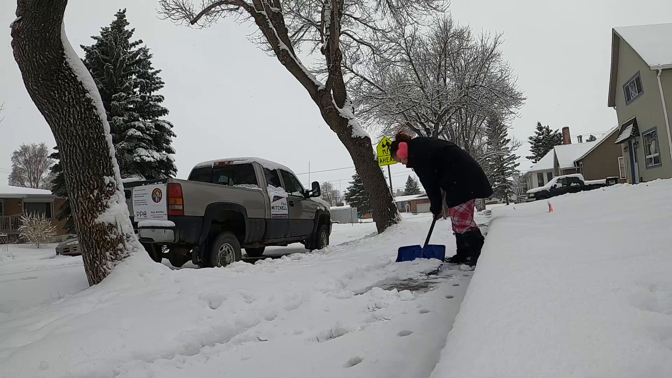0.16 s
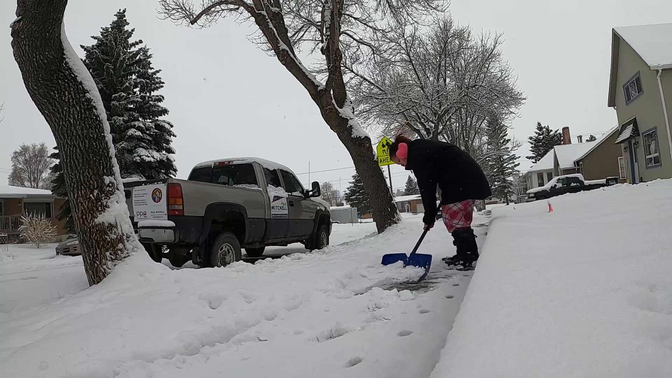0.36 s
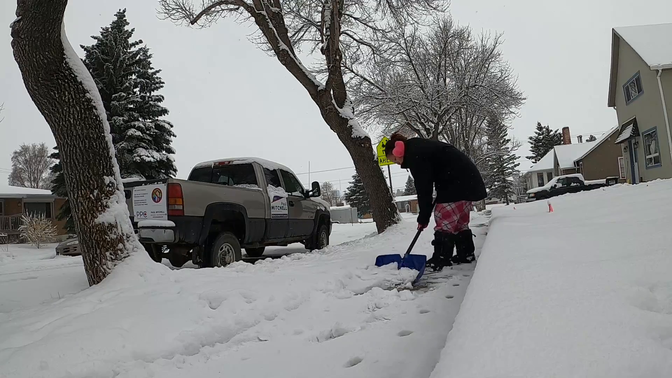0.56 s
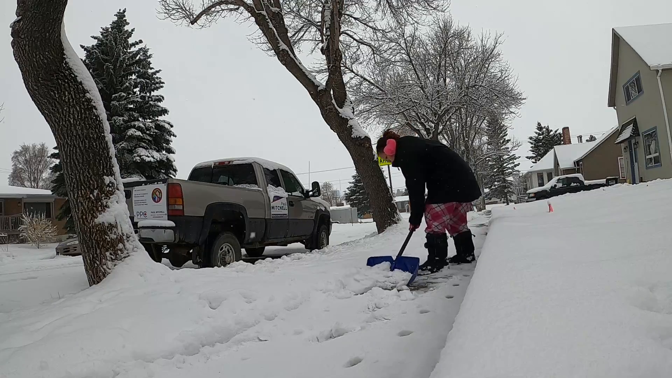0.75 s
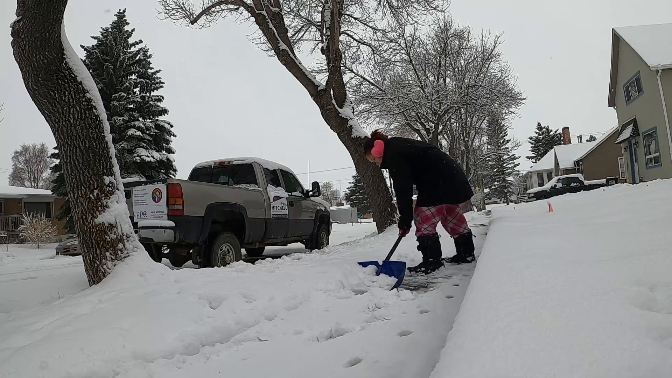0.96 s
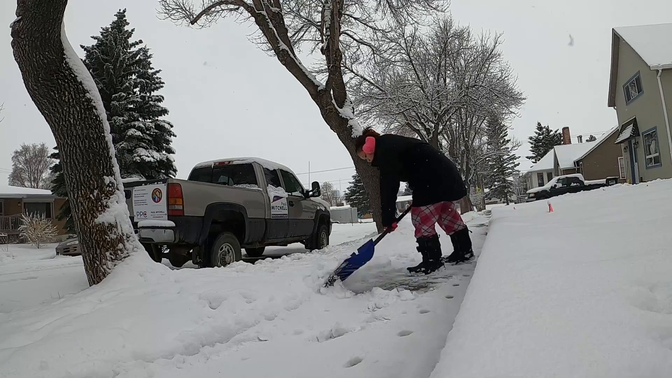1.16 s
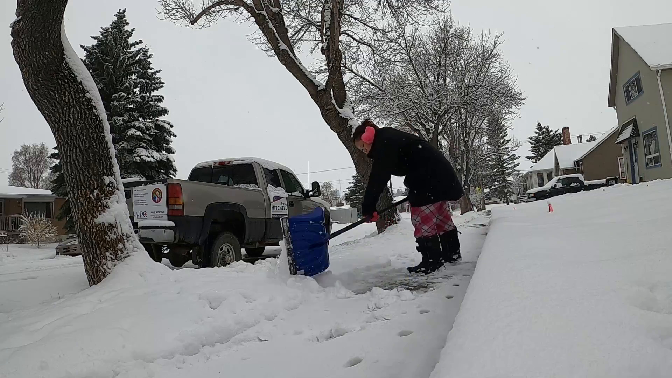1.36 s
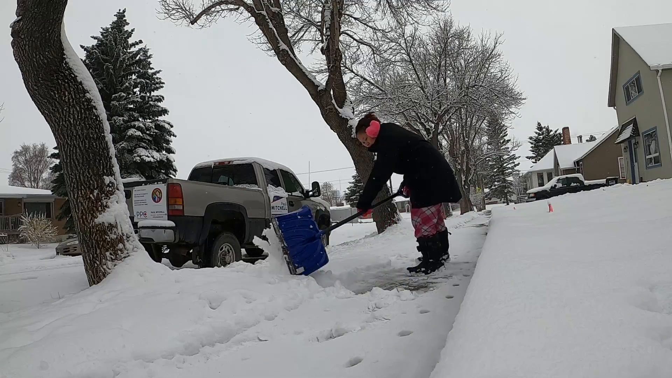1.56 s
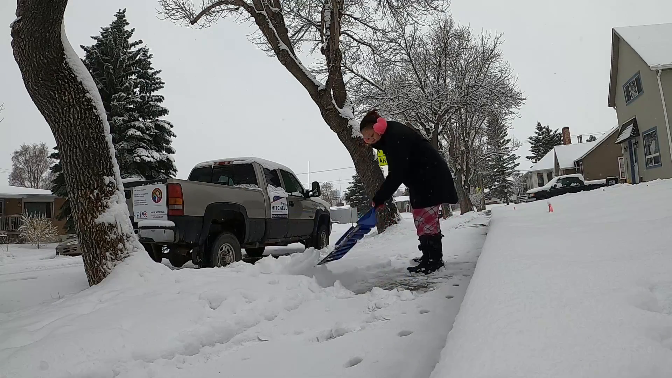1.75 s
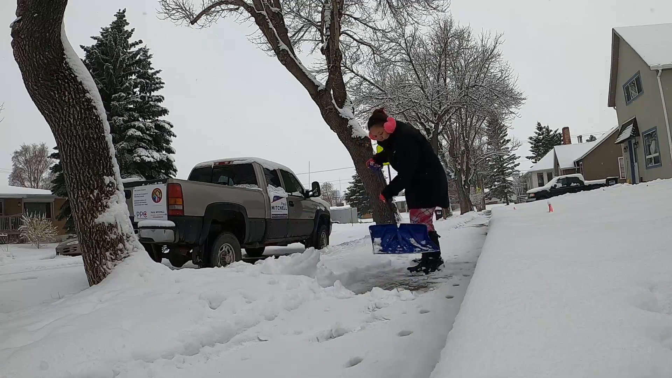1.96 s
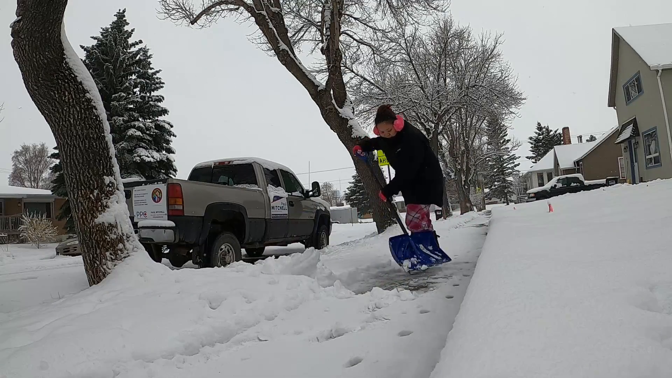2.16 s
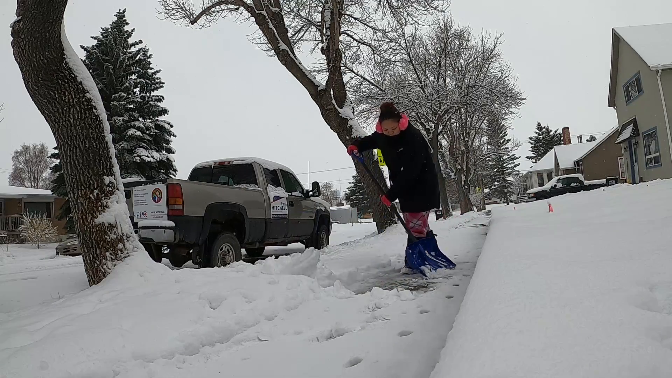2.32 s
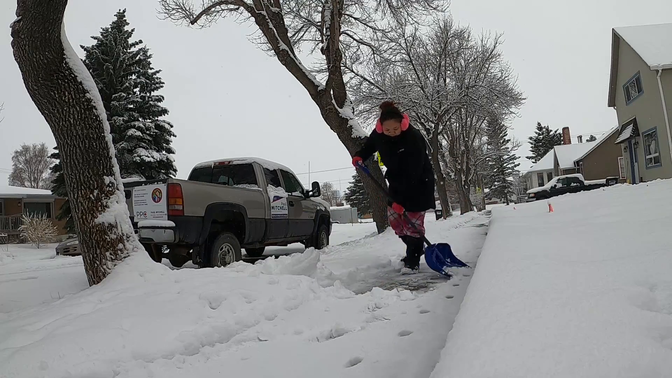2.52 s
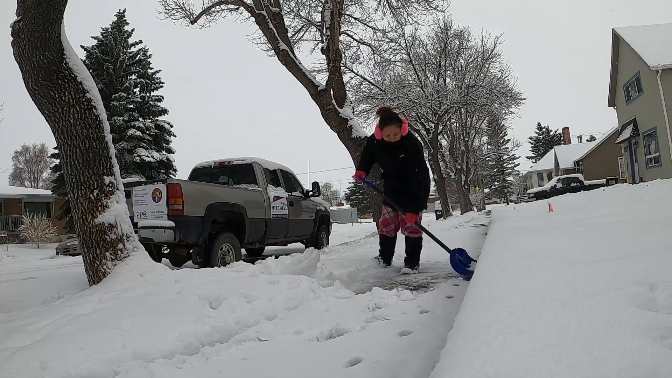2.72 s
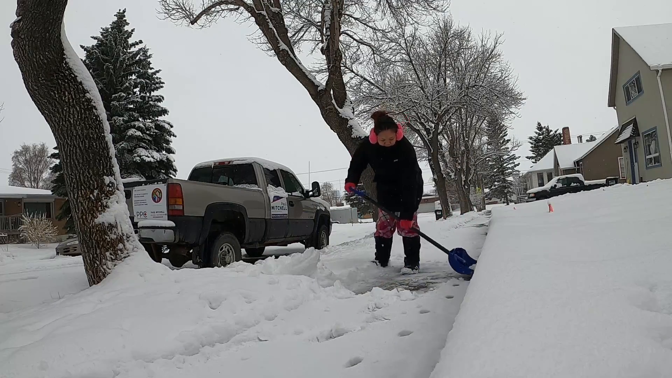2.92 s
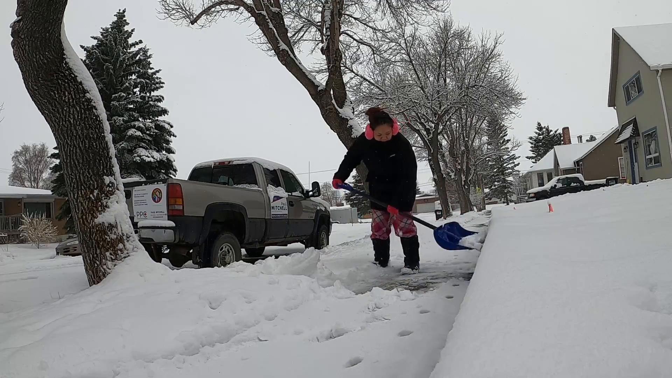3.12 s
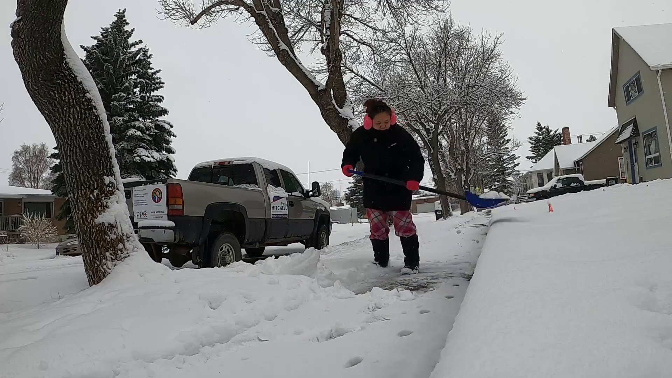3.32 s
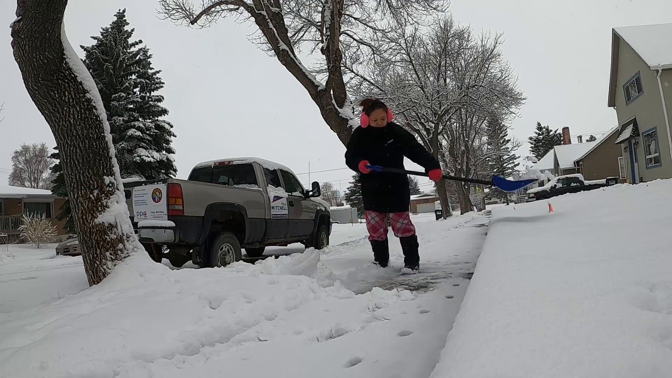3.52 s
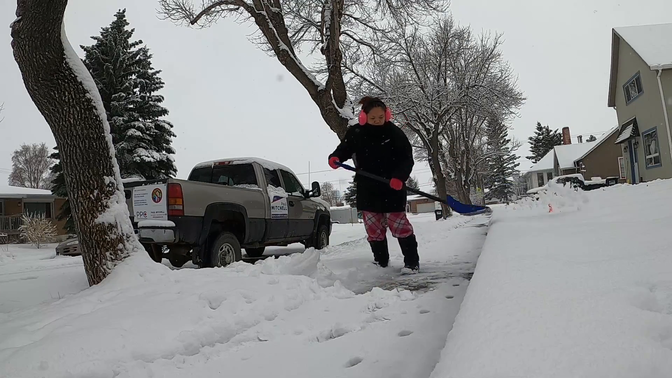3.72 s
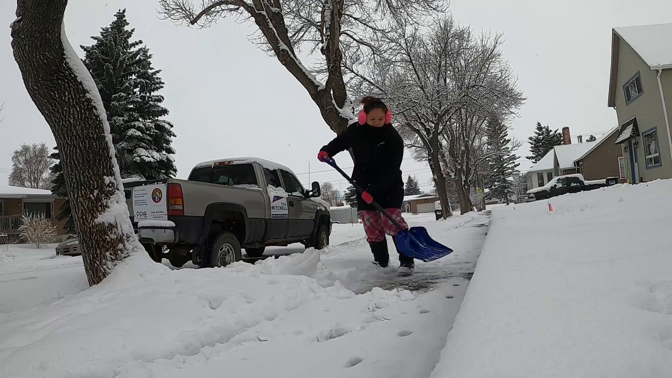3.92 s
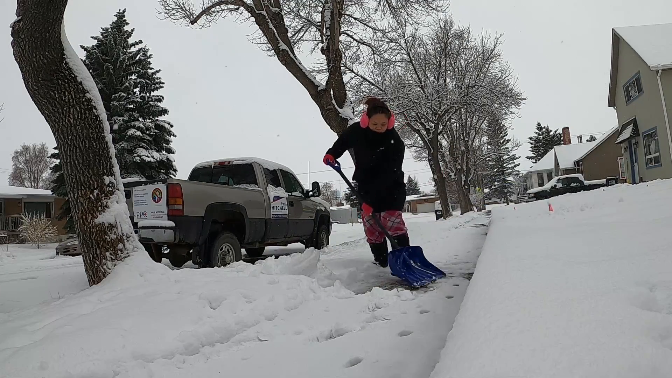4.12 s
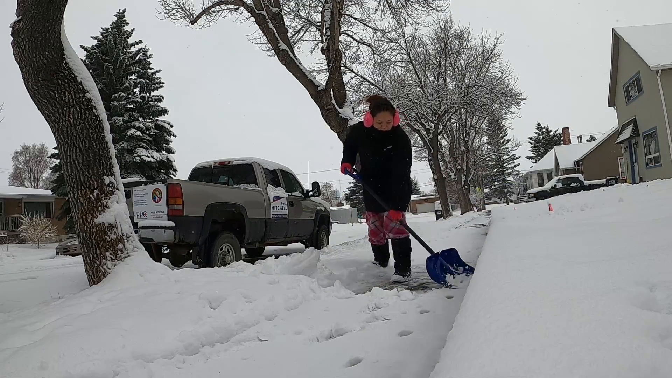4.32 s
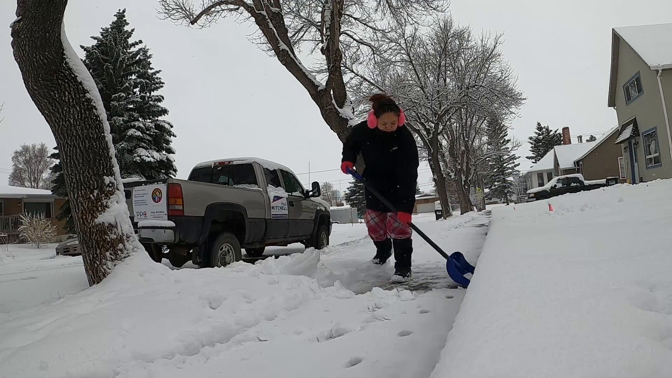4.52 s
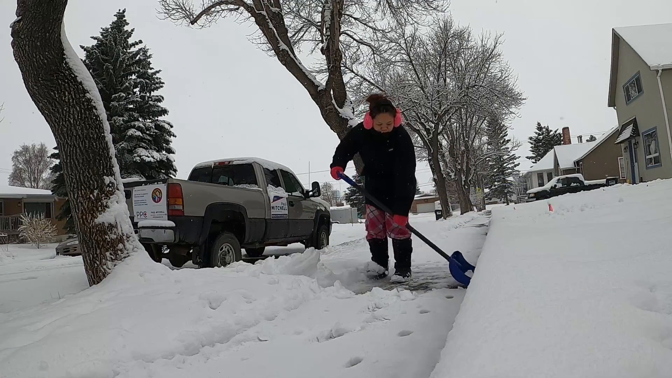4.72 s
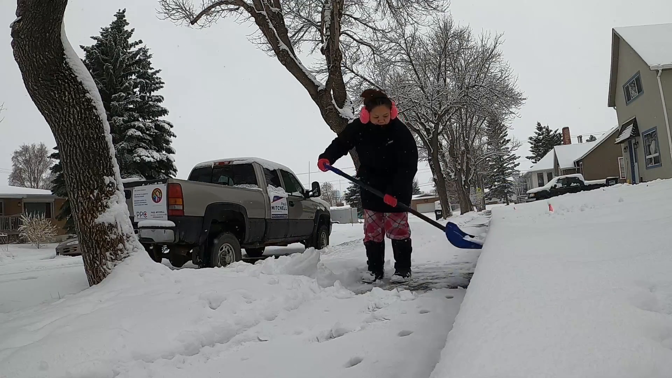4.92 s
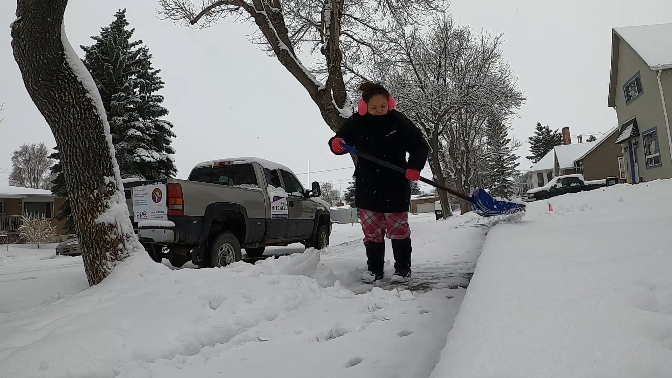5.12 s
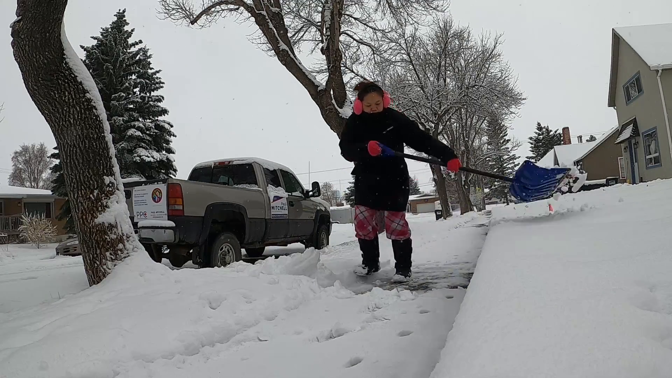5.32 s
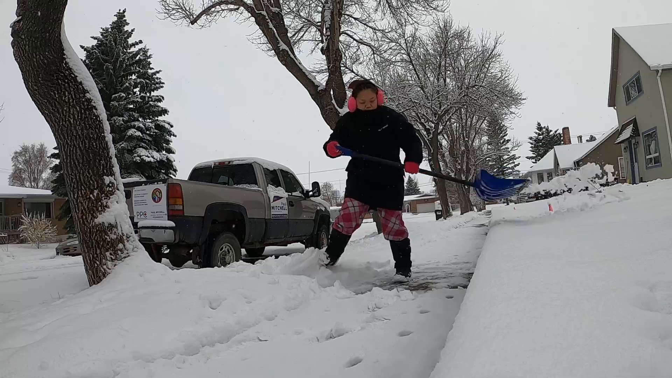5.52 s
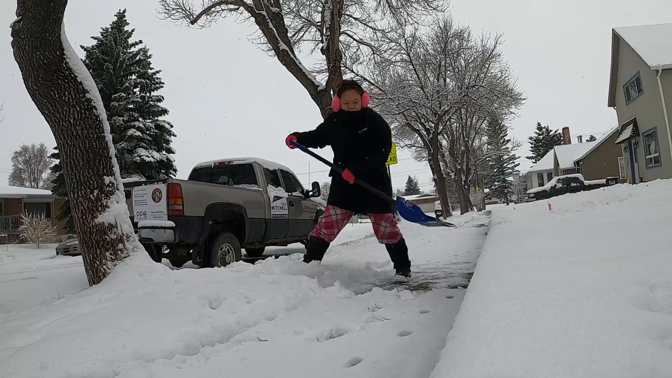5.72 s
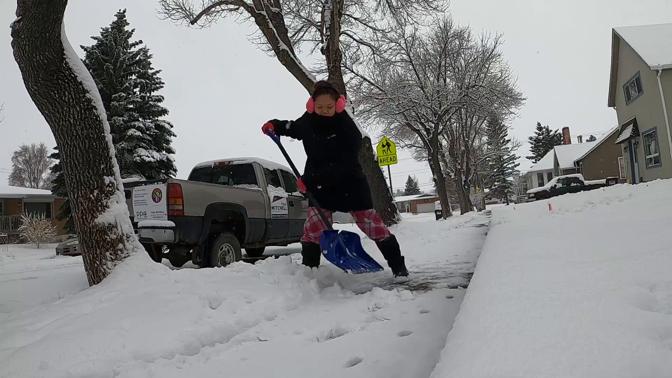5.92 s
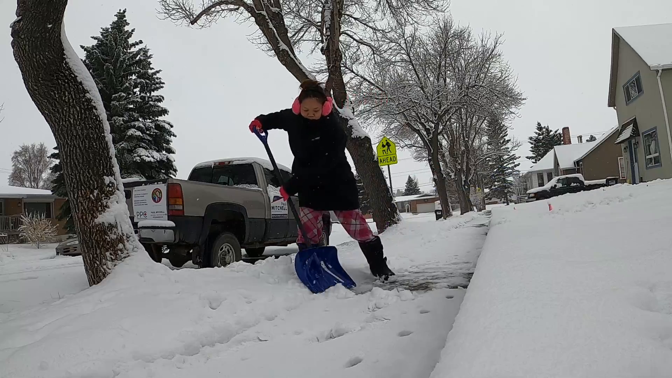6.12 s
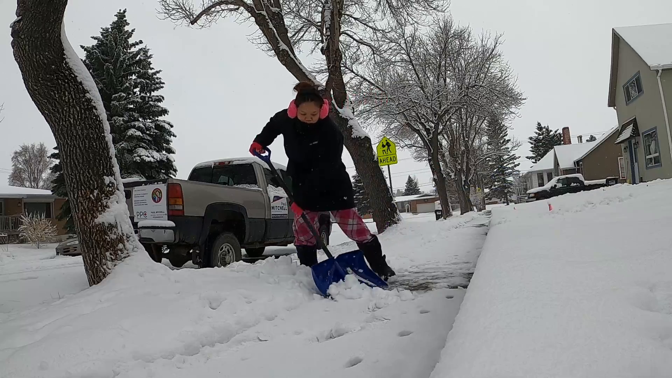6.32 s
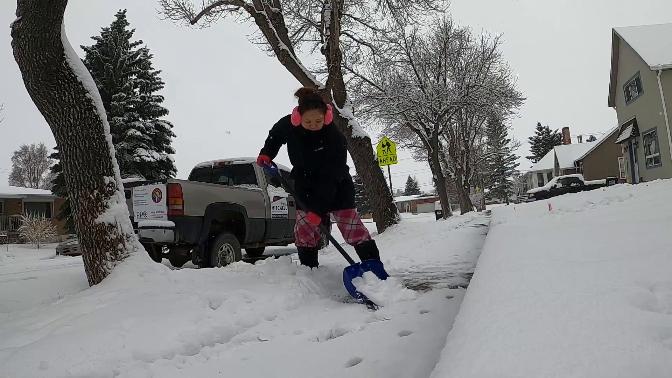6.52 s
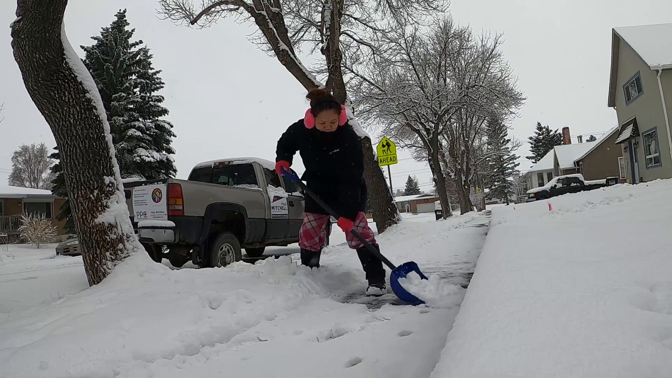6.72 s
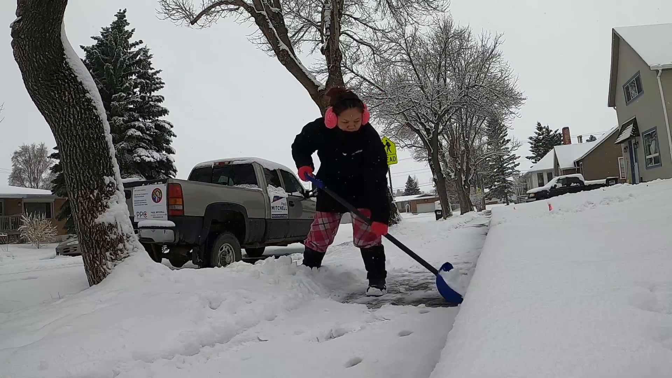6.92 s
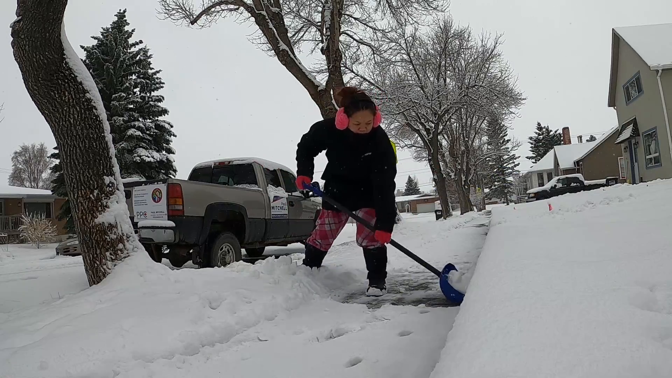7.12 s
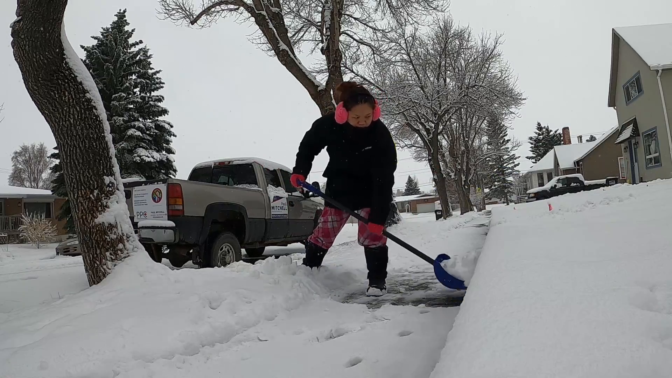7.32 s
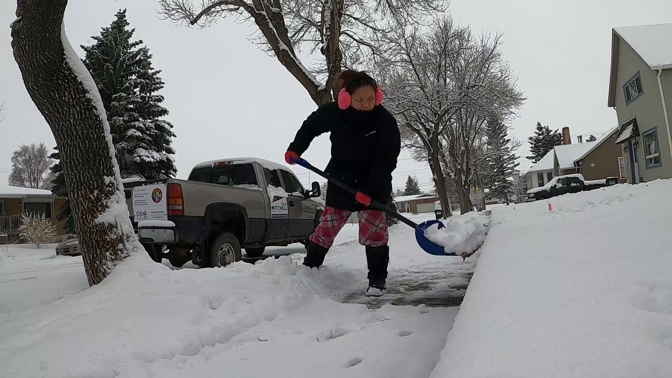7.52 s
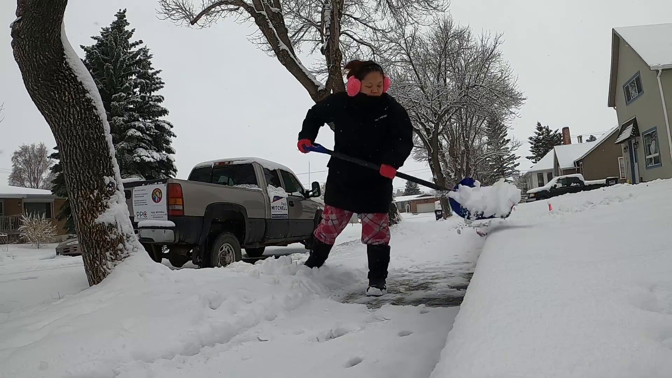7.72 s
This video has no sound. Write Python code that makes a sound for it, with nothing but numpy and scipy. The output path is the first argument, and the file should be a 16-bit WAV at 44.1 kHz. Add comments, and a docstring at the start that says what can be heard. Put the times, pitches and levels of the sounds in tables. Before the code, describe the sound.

Four uneven shovel strokes on paving under snow: stuttering plastic judder with grit rasping on top and hollow, short-ringing knocks where the edge catches. Between them are quiet gaps with muffled packed-snow crunches, tiny ice snaps and faint hisses of falling snow. The last stroke begins with the heaviest bang. The microphone is outdoors and fairly near, nearly dry, over a soft, low street hush.

```python
"""Over the soft wash of a quiet street, a plastic shovel knocks on paving and scrapes off snow in four strokes.
Its edge sticks and slips: uneven jolts ring the blade's modes as a judder, and crushed grit rasps on top.
Hard knocks ring the same blade where it catches or lands. Packed snow thumps as filtered clusters of clicks,
ice crumbs snap as short noise bursts, and falling snow hisses as dense grains.
A faint, dull echo tail follows the blade, the thumps and the snaps."""
import sys
import numpy as np
from scipy import signal
from scipy.io import wavfile
from scipy.ndimage import uniform_filter1d

SR = 44100
rng = np.random.default_rng(int(sys.argv[2]) if len(sys.argv) > 2 else 0)


def master_out(mix):
    """Clip the mix to full scale and print it as 16-bit PCM to the path in sys.argv[1]."""
    frames = np.transpose(np.atleast_2d(mix))
    ceiling = np.clip(frames, -1, 1)
    pcm = np.round(ceiling * 32767).astype(np.int16)
    wavfile.write(sys.argv[1], SR, pcm)


N = 346626

# the edge bites and runs, its contact picking the resonances: start t/s, length t/s,
# judder level/dB, rasp level/dB (both rms at mid-run), swell over the run level/dB, judder f/Hz, rasp f/Hz
SCRAPE_RUNS = [(0.124, 0.18, -22.5, -28.5, 1, 346, 5570), (.33, 0.42, -37, -44, -6.5, 440, 3100),
               (.405, 0.035, -26.5, -31.5, 10.5, 323, 3100), (0.461, 0.11, -34.5, -38.5, 5.5, 403, 3100),
               (0.717, 0.281, -30.5, -37, 1.5, 400, 3050), (1.006, .1, -26.5, -29.5, 7, 425, 1120),
               (1.5, 0.302, -56, -52, 7.5, 352, 1590), (2.416, 0.042, -25, -26.5, 5.5, 294, 780),
               (2.473, 0.13, -21, -25, -2.5, 374, 910), (2.586, .04, -19.5, -23, -1.5, 402, 910),
               (2.66, 0.024, -20, -25, -4, 325, 1650), (2.721, 0.025, -23, -25.5, 9.5, 298, 720),
               (4.192, .05, -24.5, -30.5, -1, 364, 1000), (4.265, 0.037, -22.5, -27.5, 14, 360, 1000),
               (4.317, 0.064, -22.5, -23, 1, 420, 2100), (4.386, 0.11, -19.5, -22, -7, 450, 2670),
               (4.517, 0.04, -30, -31.5, -5.5, 315, 2010), (4.605, .1, -45.5, -44, 14.5, 313, 2270),
               (6.248, .06, -45, -45.5, 9, 300, 2400), (6.312, 0.16, -18, -26, -2.5, 265, 4000),
               (6.445, 0.063, -20, -21.5, 12.5, 326, 2420), (6.524, 0.028, -23, -29, -8, 286, 2500),
               (6.56, 0.062, -35, -32.5, 2, 313, 2380), (6.655, 0.029, -39.5, -41.5, 2, 290, 2300),
               (6.712, 0.018, -33.5, -29, 1.5, 322, 2640), (6.766, 0.21, -37, -32.5, 9, 350, 2450),
               (6.993, 0.088, -33, -31.5, 2.5, 337, 1320)]
# the edge catches on the paving: t/s, thud level/dB, crack level/dB (rms of 20 ms), thud f/Hz, crack f/Hz
EDGE_CATCHES = [(0.122, -21, -35, 345, 1100), (.164, -15.5, -31.5, 370, 1500), (.21, -18.5, -32, 375, 1500),
                (0.259, -21, -45, 315, 1500), (.288, -17.5, -28, 335, 2040), (0.341, -23, -34, 346, 1510),
                (0.405, -25.5, -29.5, 328, 2320), (0.873, -21.5, -33.5, 400, 1000),
                (.942, -23, -35, 343, 1290), (1.017, -17, -33, 385, 1300), (1.033, -19, -29, 370, 1100),
                (1.091, -24.5, -49, 557, 1090), (2.759, -18, -50, 276, 700),
                (3.141, -30.5, -40.5, 340, 650), (4.391, -28, -27, 465, 2400),
                (4.496, -34, -26.5, 400, 1800), (6.377, -13.5, -19, 268, 4070),
                (6.408, -14.5, -22.5, 273, 2570), (7.098, -14.5, -35, 260, 800)]
# the blade is set down hard: t/s, thud level/dB, crack level/dB (rms of 20 ms), thud f/Hz, crack f/Hz,
# rebound thud against the first level/dB
BLADE_LANDINGS = [(2.668, -25.5, -19, 400, 860, 7), (4.193, -16, -33, 390, 1190, -5.5),
                  (5.057, -24.5, -26.5, 243, 660, -0.5), (6.316, -11.5, -19.5, 365, 2220, -3.5)]
# modes of the blade and shaft: f/Hz, relative level/dB, decay by 60 dB t/s
BLADE_MODES = [(154.3, -6.5, 0.048), (197.4, -8.5, 0.35), (261, 3, 0.041), (328.5, 0, 0.094),
               (376.4, 1.5, 0.069), (485.3, 1, 0.046), (582.6, -3, 0.062), (691, 1.5, 0.037),
               (870, -12, 0.025), (1072, -8.5, 0.016), (1136, -5.5, 0.0084), (1662, -15, 0.16),
               (2000, -39.5, 0.005), (2320, -71, 0.0057), (2710, -71.5, 0.057), (4100, -10.5, 0.04),
               (6460, -5.5, 0.043)]
# colour of grit under the edge: f/Hz, filter level/dB
RASP_COLOUR = [(300, -20), (650, 1), (1000, 0.5), (1700, 2), (3000, 2), (4200, -2), (5200, -9),
               (6300, -11.5), (7500, -16.5), (8700, -22), (9600, -15.5), (11500, -29.5), (13500, -42),
               (15000, -48)]
# dull colour of crunching packed snow: f/Hz, filter level/dB
CRUNCH_COLOUR = [(20, -8.5), (60, -24), (120, 0), (200, 5), (320, -3), (480, -8), (900, -8.5), (2000, -47),
                 (6000, -75)]
# boots and blade press into packed snow: t/s, peak level/dB, f/Hz, length t/s
SNOW_THUMPS = [(1.589, -36.5, 288, 0.013), (1.678, -37.5, 348, 0.017), (1.956, -30.5, 215, 0.032),
               (2.005, -33, 384, 0.011), (2.367, -24.5, 198, 0.007), (2.393, -28.5, 119, .017),
               (3.083, -32, 193, 0.029), (4.95, -39, 210, 0.0078), (5.895, -27.5, 240, 0.05),
               (6.017, -28.5, 240, 0.015), (6.179, -27.5, 194, 0.0087), (6.262, -27.5, 170, 0.022),
               (7.547, -31.5, 276, 0.0097), (7.72, -33.5, 215, 0.013)]
# ice crumbs snap: t/s, peak level/dB, f/Hz
ICE_CRUMBS = [(.443, -21.5, 4000), (0.462, -21, 1780), (0.7346, -23.5, 3300), (0.824, -26, 2990),
              (2.2343, -42, 5160), (3.037, -40, 2090), (3.469, -34, 5030), (3.5885, -37, 2530),
              (5.438, -29, 2220), (5.6942, -40.5, 1500), (6.536, -17, 2600)]
# loose snow slides off the blade and falls: middle t/s, nominal length t/s (spray() scales it), level/dB
SNOW_SPILLS = [(1.7, 0.19, -58.5), (2.323, 0.23, -62), (3.476, 0.14, -52), (3.622, .1, -48),
               (4.172, 0.24, -57), (4.922, 0.053, -57.5), (5.019, 0.026, -51.5), (5.196, 0.22, -49),
               (5.473, 0.13, -42.5), (6.04, 0.37, -55.5), (7.636, 0.19, -66.5), (7.86, .09, -51.5)]
# bright colour of ice and falling crystals: f/Hz, filter level/dB
SPRAY_COLOUR = [(300, -18), (900, -4), (2200, 3), (4200, 1), (5500, -4), (7000, -8), (8600, -16),
                (9700, -10.5), (12000, -23), (15000, -60.5)]
# colour of the far street: f/Hz, filter level/dB
STREET_COLOUR = [(20, -15.5), (50, -8.5), (100, -3), (180, 0.5), (300, -7.5), (440, -12.5), (750, -8.5),
                 (1150, -5.5), (1900, -9), (2600, -15), (5000, -27.5), (8600, -40), (9800, -45),
                 (14500, -54)]

BITE_S, LIFT_DB_PER_S = 0.0045, 471  # a scrape sets in quickly and dies as the edge lifts
SETTLE_DB, SETTLE_DB_PER_S = -19.5, 86  # loosened grit trickles on afterwards
CATCH_CHATTER_S, LANDING_CHATTER_S = 0.0069, 0.018
# the blade rocks back and hits again, lower and duller, with a narrower resonance and a longer ring
REBOUND_S, REBOUND_PITCH, REBOUND_CRACK_DB = 0.018, 0.69, -12.5
REBOUND_WIDTH_HZ, REBOUND_RING_ON = 90, 4.3
STREET_DB = -51.5
DIP_S, DIP_DB, DIP_WIDTH_S = 7.38, -5.5, 0.21  # the background level dips briefly, once
EDGE_HZ = 15200  # upper band limit


def slide(s, length_s, judder_db, rasp_db, swell_db, low_hz, high_hz, ring,
          slips_per_s=190, slip_spread_db=3.0, burst_s=0.022, steady_share=0.13,
          crunch_db=-19, sing=0.46, sing_width_hz=450):
    """Stick and slip: each uneven slip jolts the blade and crushes a burst of grit."""
    t = np.arange(SR * 3 // 4) / SR
    chance = rng.standard_normal((600, 2))
    # the typical gap is 1 / slips_per_s; some are far longer
    at = np.cumsum(np.exp(.55 * chance[:, 0])) * SR / slips_per_s
    jolts = gain_of(slip_spread_db * chance[:, 1])
    slips = np.bincount((at - at[0]).astype(int), jolts, len(t))[:len(t)]
    bursts = evened(signal.lfilter([1], [1, -np.exp(-1 / (burst_s * SR))], slips))
    # packed snow crunches dully ahead of the edge
    crunch = coloured(bursts * rng.standard_normal(len(t)), CRUNCH_COLOUR)
    low = evened(judder(slips, low_hz, ring, width_hz=270)) + gain_of(crunch_db) * evened(crunch)
    high = rasp(steady_share + bursts, ring)
    high = high + sing * resonate(high, high_hz, sing_width_hz)
    # the push grows or slackens evenly in dB over the run
    push = gain_of(swell_db * (np.minimum(t / length_s, 1) - .5))
    touching = envelope(t, length_s, BITE_S, LIFT_DB_PER_S)
    settling = gain_of(SETTLE_DB) * envelope(t, length_s, BITE_S, SETTLE_DB_PER_S)
    low = touching * gain_of(judder_db) * steadied(low, size=1000)
    high = np.maximum(touching, settling) * gain_of(rasp_db) * steadied(high, size=1000)
    return s, push * (low + high)


def knock(s, thud_db, crack_db, hz, chatter_s, ring, rebound=0.81, width_hz=240,
          clack=3.2, clack_hz=1300, ring_on=2.9):
    """One blow and a dying chatter of rebounds ring the blade, with a clack of plastic on stone."""
    t = np.arange(SR // 3) / SR
    dying = np.exp(-t / chatter_s)
    force = rebound * dying * grains(len(t), 320, 3.7)
    force[0] = 1
    # a longer, softer contact gives a lower thud
    force = np.convolve(force, np.hanning(int(SR / hz / 2)))[:len(t)]
    # snow that stops the chatter early also damps the ring
    thud = judder(force, hz, ring, width_hz) * dying ** (1 / ring_on)
    # the blade is too small to radiate deep bass, and a soft blow carries nothing far above its pitch
    band = signal.butter(2, [110, 1.78 * hz], "band", fs=SR, output="sos")
    thud = signal.sosfilt(band, thud)
    crack = rasp(dying[:SR // 12], ring)
    crack = crack + clack * resonate(crack, clack_hz, clack_hz)
    # each level is the rms of that part's first 20 ms
    sound = gain_of(thud_db) * thud / np.std(thud[:SR // 50])
    # the crack comes once the blade is pressed home
    add(sound, .5 / hz, gain_of(crack_db) * crack / np.std(crack[:SR // 50]))
    return s - .5 / hz, sound


def blade_ring():
    """The blade's answer to one tap; neighbouring modes swing in opposite senses."""
    t = np.arange(SR // 3) / SR
    ring = np.zeros(len(t))
    for k, (hz, db, t60) in enumerate(BLADE_MODES):
        ring += (-1) ** k * gain_of(db - 60 * t / t60) * np.sin(2 * np.pi * hz * t)
    return ring / np.linalg.norm(ring)


def judder(force, hz, ring, width_hz, top_hz=950):
    """Slow pushes bend the blade; the contact picks the modes near hz."""
    bend = signal.oaconvolve(resonate(force, hz, width_hz), ring)[:len(force)]
    return signal.sosfilt(signal.butter(2, top_hz, fs=SR, output="sos"), bend)


def rasp(pressure, ring, per_s=5000, spread_db=0.0, ring_db=-7, scratch_share=0.48):
    """Grit cracks and scratches under the edge, heard directly and through the blade's ring."""
    cracks = evened(grains(len(pressure), per_s, spread_db))
    grit = pressure * (cracks + scratch_share * scratches(len(pressure)))
    through_blade = signal.oaconvolve(grit, ring)[:len(grit)]
    return coloured(grit + gain_of(ring_db) * through_blade, RASP_COLOUR)


def scratches(size, per_s=35, decay_s=0.0061, width_hz=300, count=14):
    """Stones and ridges of ice drag for a few milliseconds, spread over a set of pitches."""
    out = np.zeros(size)
    for hz in np.geomspace(900, 5500, count):
        starts = abs(grains(size, per_s, 2.8))
        drag = signal.lfilter([1], [1, -np.exp(-1 / (decay_s * SR))], starts)
        out += resonate(drag * rng.standard_normal(size), hz, width_hz)
    return evened(out)


def thump(s, db, hz, length_s, width_hz=220, cluster_share=0.66):
    """Snow gives way with one push and a quick cluster of small, muffled collapses."""
    u = np.arange(SR // 6) / SR / length_s * 2
    # the collapses are strongest at half the length
    cluster = cluster_share * u * np.exp(-u) * grains(len(u), 1500, 5.4)
    cluster[0] = 1
    dull = coloured(resonate(cluster, hz, width_hz), CRUNCH_COLOUR)
    return s, gain_of(db) * dull / abs(dull).max()


def crumb(s, db, hz, decay_s=0.0055, width_hz=3000):
    """A crumb of ice breaks with a short bright snap of decaying noise."""
    t = np.arange(SR // 20) / SR
    burst = np.exp(-t / decay_s) * rng.standard_normal(len(t))
    snap = coloured(resonate(burst, hz, width_hz), SPRAY_COLOUR)
    return s, gain_of(db) * snap / abs(snap).max()


def spray(reach=0.68):
    """Thousands of crystals patter down as a fine hiss; each spill gathers and thins out."""
    power = np.zeros(N)
    for s, length_s, db in SNOW_SPILLS:
        power += (gain_of(db) * swell(s, reach * length_s)) ** 2
    return np.sqrt(power) * evened(coloured(grains(N, 8000, 4.1), SPRAY_COLOUR))


def yard(x, echo_db=-26, t60=0.19, dull_hz=3500):
    """Trunks and house fronts scatter a faint, dull tail."""
    t = np.arange(SR) / SR
    # the echoes build up over 30 ms while they decay
    tail = grains(SR, 2000, 2) * gain_of(-60 * t / t60) * np.minimum(t / .03, 1)
    tail = signal.sosfilt(signal.butter(2, dull_hz, fs=SR, output="sos"), tail)
    return x + gain_of(echo_db) * signal.oaconvolve(x, tail / np.linalg.norm(tail))[:N]


def street():
    """The wash of far traffic, dulled by snow: coloured noise, with one brief dip in level."""
    level_db = STREET_DB + DIP_DB * swell(DIP_S, DIP_WIDTH_S)
    return gain_of(level_db) * evened(coloured(rng.standard_normal(N), STREET_COLOUR))


def grains(count, per_s, spread_db):
    """Clicks at random moments, most small and a few large."""
    size_db = spread_db * np.minimum(rng.exponential(1, count), 4)
    return rng.choice([-1, 1], count) * gain_of(size_db) * (rng.random(count) < per_s / SR)


def resonate(x, hz, width):
    """A resonance of gain 1 at hz, with its bandwidth in Hz."""
    turn = np.exp(2j * np.pi * np.cumsum(hz * np.ones(len(x))) / SR)
    r = np.exp(-np.pi * width / SR)
    # shift the pitch down to zero, smooth, and shift back
    return 2 * (turn * signal.lfilter([1 - r], [1, -r], x / turn)).real


def coloured(x, points, size=4096):
    """Causal minimum-phase filter with the gain of an (f/Hz, level/dB) table."""
    hz, db = np.transpose(points)
    log_hz = np.log(abs(np.fft.fftfreq(size, 1 / SR)) + 1)
    log_gain = np.log(gain_of(np.interp(log_hz, np.log(hz), db)))
    taps = np.fft.ifft(np.exp(np.conj(signal.hilbert(log_gain)))).real
    return signal.oaconvolve(x, taps[:size // 2])[:len(x)]


def envelope(t, length_s, attack_s, fall_db_per_s):
    """Rises, holds until length_s, then dies away."""
    return np.minimum(t / attack_s, 1) * gain_of(-fall_db_per_s * np.maximum(t - length_s, 0))


def swell(middle_s, half_width_s):
    """A smooth rise and fall around one moment."""
    return np.exp(-((np.arange(N) / SR - middle_s) / half_width_s) ** 2)


def gain_of(db):
    """Decibels to a factor."""
    return 10 ** (np.asarray(db) / 20)


def evened(x):
    """Scales to rms 1."""
    return x / np.sqrt(np.mean(x ** 2) + 1e-20)


def steadied(x, size):
    """Scales to about rms 1 over every stretch of size samples; faster grain stays."""
    power = uniform_filter1d(uniform_filter1d(x ** 2, size), size)
    return x / np.sqrt(abs(power) + 1e-12)


def add(mix, s, sound):
    """Mixes a sound in at time s."""
    part = mix[round(s * SR):][:len(sound)]
    part += sound[:len(part)]


def scene():
    """Shovel, packed snow and ice in the open air, over falling snow and the street."""
    work, ring = np.zeros(N), blade_ring()
    for row in SCRAPE_RUNS:
        add(work, *slide(*row, ring))
    for s, thud_db, crack_db, hz, crack_hz in EDGE_CATCHES:
        add(work, *knock(s, thud_db, crack_db, hz, CATCH_CHATTER_S, ring, clack_hz=crack_hz))
    for s, thud_db, crack_db, hz, crack_hz, rebound_db in BLADE_LANDINGS:
        add(work, *knock(s, thud_db, crack_db, hz, LANDING_CHATTER_S, ring, clack_hz=crack_hz))
        add(work, *knock(s + REBOUND_S, thud_db + rebound_db, crack_db + REBOUND_CRACK_DB,
                         hz * REBOUND_PITCH, LANDING_CHATTER_S, ring, width_hz=REBOUND_WIDTH_HZ,
                         clack_hz=crack_hz, ring_on=REBOUND_RING_ON))
    for row in SNOW_THUMPS:
        add(work, *thump(*row))
    for row in ICE_CRUMBS:
        add(work, *crumb(*row))
    return (yard(work) + spray() + street())[None]


def record(dry, low_cut_hz=50):
    """The microphone's bass roll-off, the full-scale ceiling, then the band limit."""
    rolled_off = signal.sosfilt(signal.butter(1, low_cut_hz, "high", fs=SR, output="sos"), dry)
    heard = np.clip(rolled_off, -1, 1)
    band_limit = signal.firwin(255, EDGE_HZ, window=("kaiser", 9), fs=SR)
    return signal.oaconvolve(heard, band_limit[None], "same")


dry = scene()
out = record(dry)
master_out(out)
```